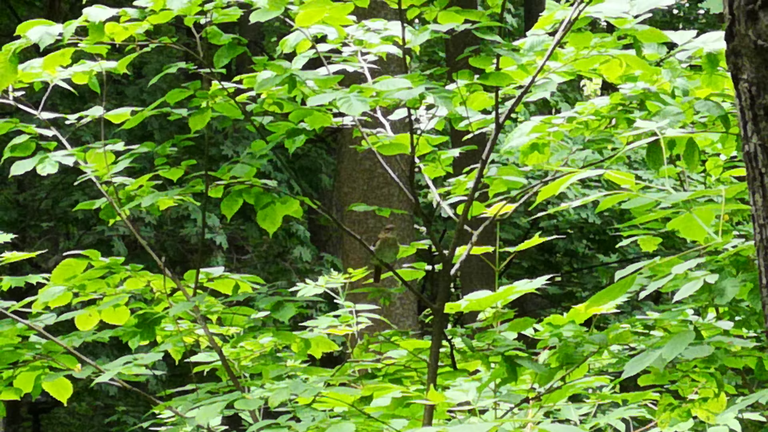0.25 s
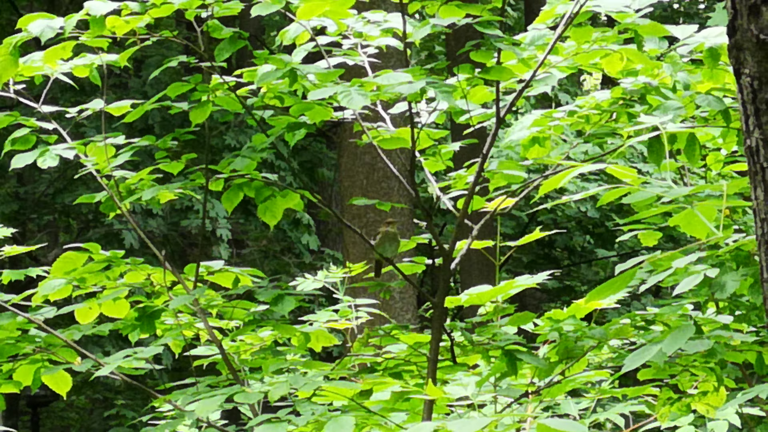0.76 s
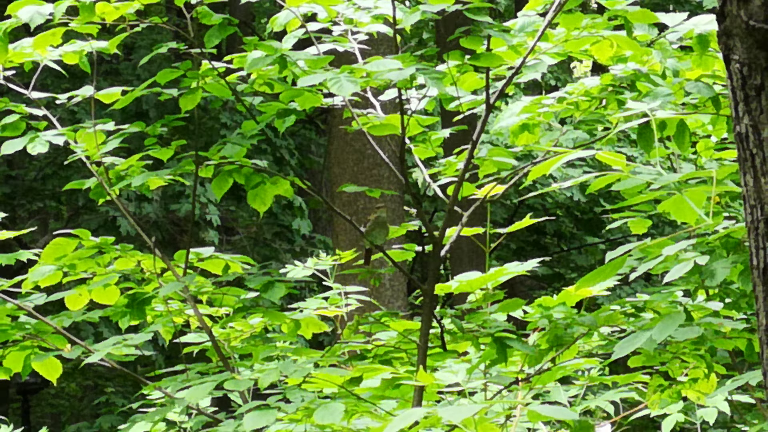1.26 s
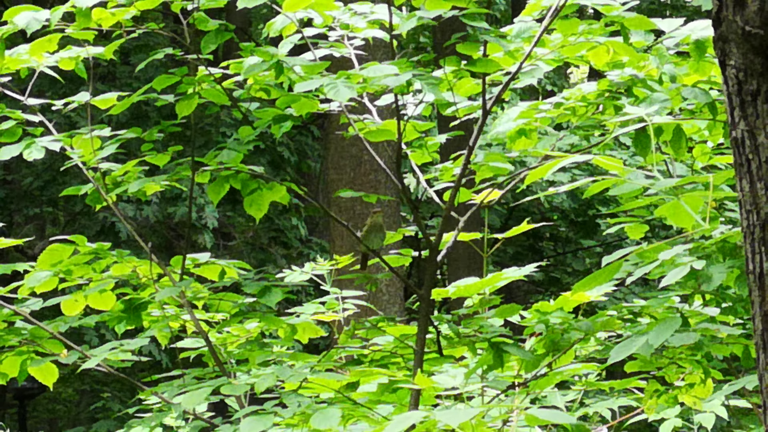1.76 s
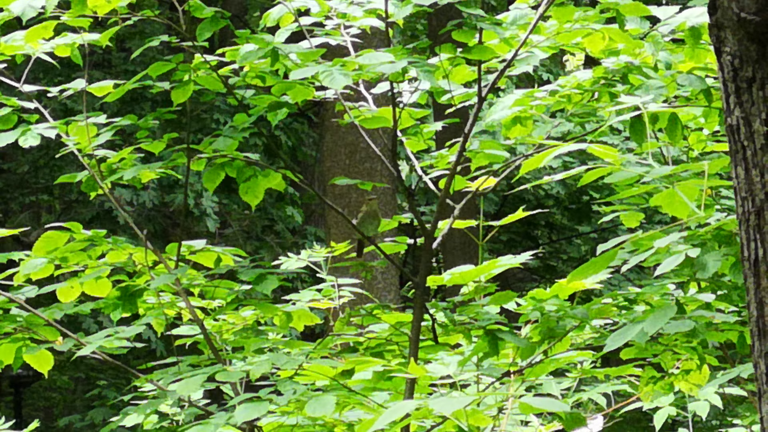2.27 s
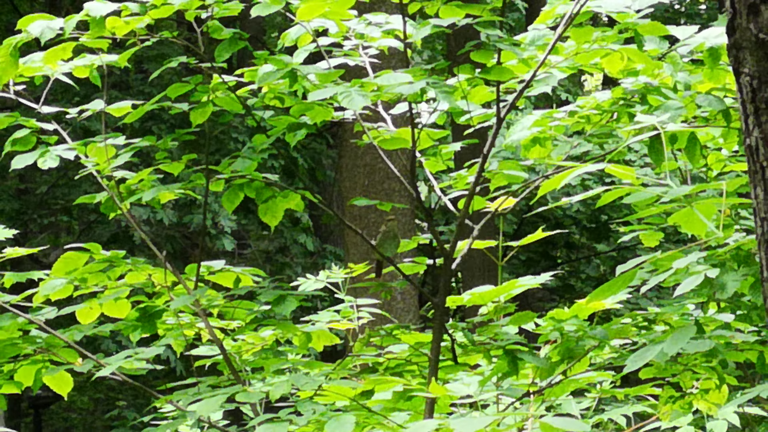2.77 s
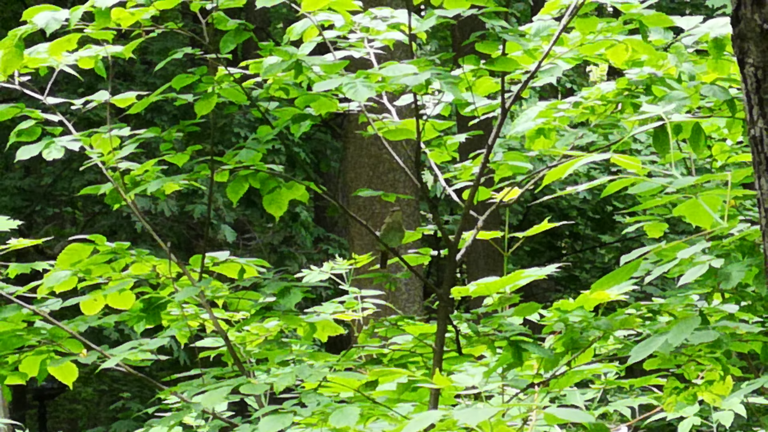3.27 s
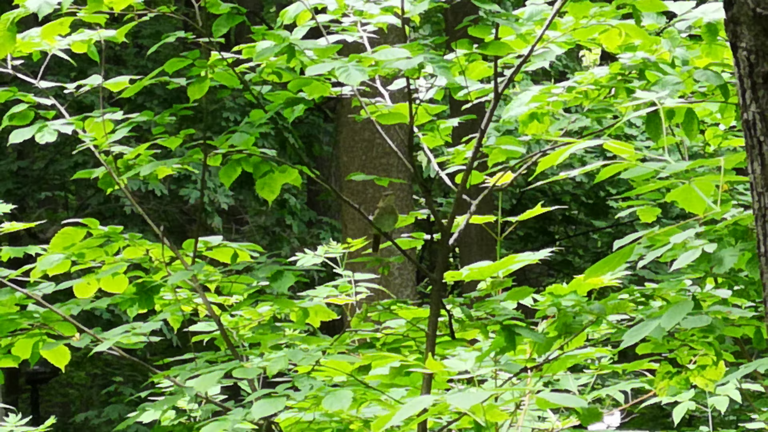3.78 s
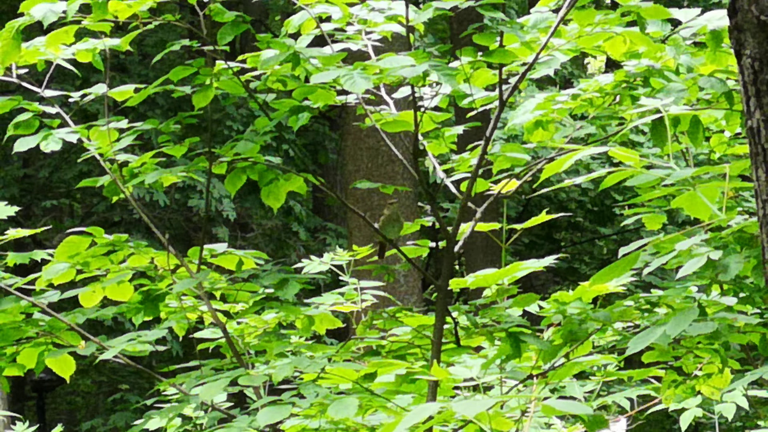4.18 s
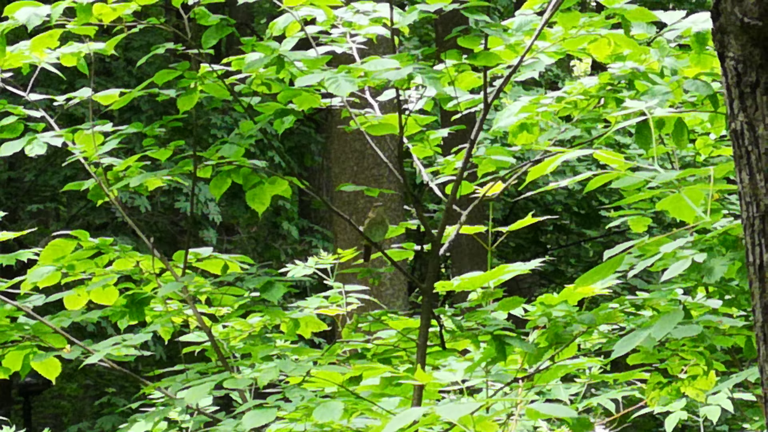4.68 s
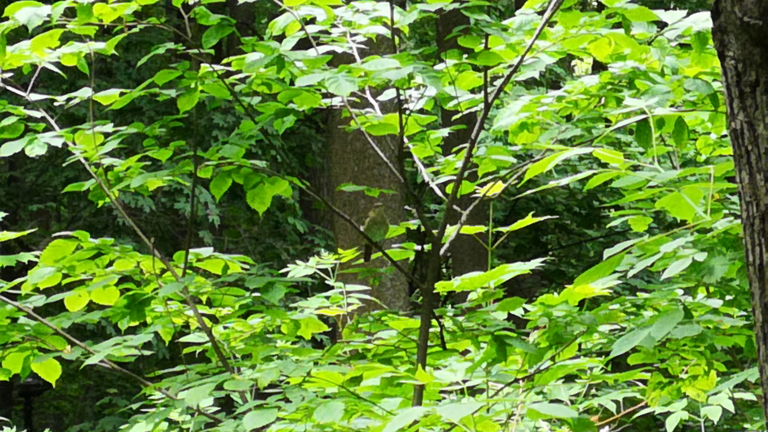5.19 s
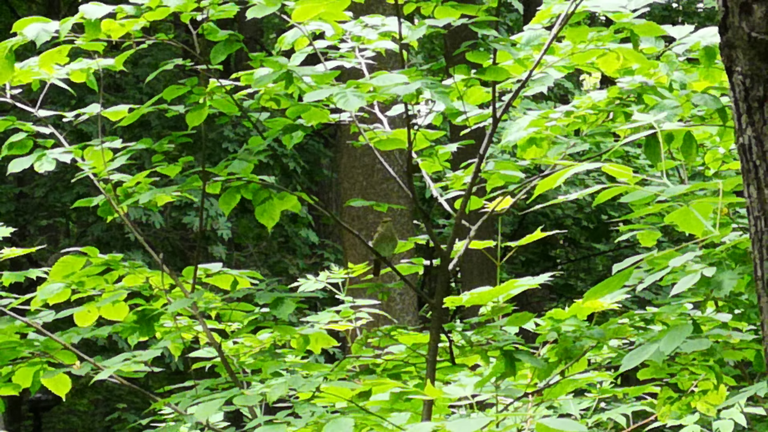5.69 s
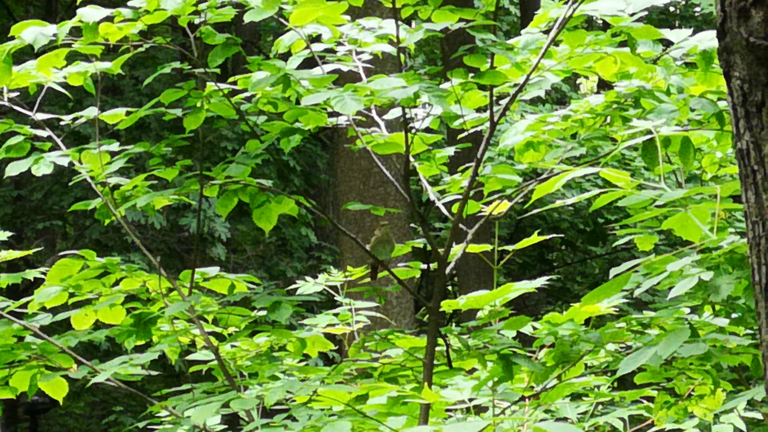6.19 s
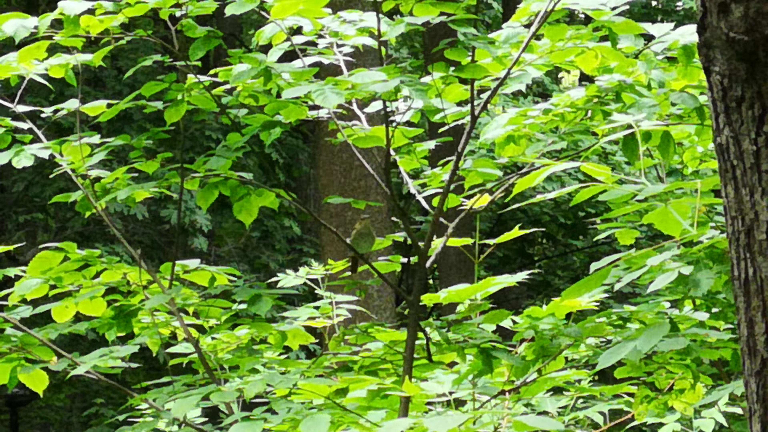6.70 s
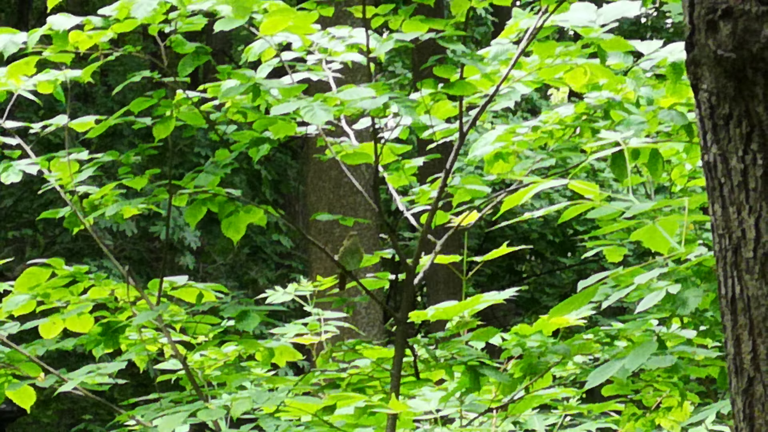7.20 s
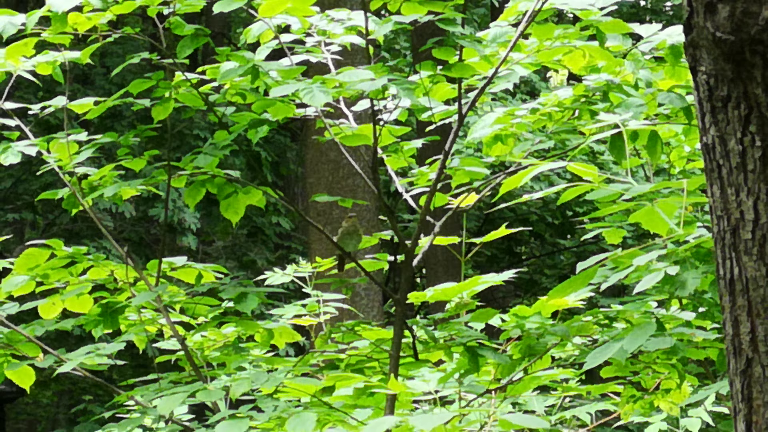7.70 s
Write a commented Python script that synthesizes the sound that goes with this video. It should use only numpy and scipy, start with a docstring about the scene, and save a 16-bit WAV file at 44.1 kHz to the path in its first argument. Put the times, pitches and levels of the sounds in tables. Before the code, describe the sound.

Whistled bird notes and a run of dry clicks echo among trees, with faint distant birds, rustling leaves and a low rumble.

```python
"""A nightingale in a leafy wood

A nightingale sings one phrase: thin high calls, sliding whistles, three held notes that end in a whip,
and a run of dry double clicks. Trunks and leaves scatter its song and the faint calls of far birds.
A low rumble lies under it all, and one gust stirs the leaves. Near the end something small taps
the casing beside the right microphone and makes it ring."""
import sys
import numpy as np
from scipy import signal
from scipy.fft import rfft, irfft
from scipy.io import wavfile

SR = 44100
rng = np.random.default_rng(int(sys.argv[2]) if len(sys.argv) > 2 else 0)


def unload_audio(sound):
    """Save the sound as a 16-bit wav file, at the path given as the first command line argument."""
    columns = np.transpose(np.atleast_2d(sound))
    # keep every value between -1 and 1, then stretch to whole-number steps
    steps = np.round(np.clip(columns, -1, 1) * 32767)
    wavfile.write(sys.argv[1], SR, steps.astype(np.int16))


N = 350154
TIME = np.arange(N) / SR

# The nightingale's held notes. Each row: start in seconds, length in seconds, opening pitch in Hz,
# held pitch in Hz, level in dB, swell over the note in dB, level of the closing whip in dB.
HELD_NOTES = [ (1.769, 0.045, 6060, 5723, -26, 13, -23.5), (2.393, 0.051, 6110, 5730, -24, 11, -21),
              (4.068, .049, 6430, 5800, -28, 17, -26)]


def undb(db):
    """Turn decibels into a number to multiply a sound by."""
    return 10 ** (np.asarray(db) / 20)


def add(out, start_s, sound):
    """Mix a sound in at the given time."""
    i = int(start_s * SR)
    out[..., i:i + sound.shape[-1]] += sound[..., :N - i]


def tone_curve(points):
    """Join (Hz, dB) points into a gain for every frequency."""
    hz, db = np.transpose(points)
    return undb(np.interp(np.log(np.fft.rfftfreq(N, 1 / SR) + 1), np.log(hz), db))


def wander(turns_per_s):
    """A random curve that drifts around zero, by about 1 either way."""
    points = rng.standard_normal(int(N / SR * turns_per_s) + 2)
    return np.interp(TIME * turns_per_s, np.arange(len(points)), points)


def fade(u, rise, fall):
    """Fade in and out as u runs from 0 to 1; rise and fall are shares of the sound's length."""
    opening = np.sin(np.pi / 2 * np.clip(u / rise, 0, 1)) ** 2
    closing = np.sin(np.pi / 2 * np.clip((1 - u) / fall, 0, 1)) ** 2
    return opening * closing


def wide_noise(spectrum):
    """Noise shaped by (Hz, dB) points: alike on both sides in the bass, wide in the treble."""
    # Stereo width. Each row: frequency in Hz, level of the differing part over the shared part in dB.
    width = [(60, -33.5), (110, -17.5), (200, -18.5), (380, -0.5), (700, 2), (1290, -4), (2380, 2),
             (4400, -1), (8120, 1.5), (15000, 0)]
    shared, differing = rfft(rng.standard_normal((2, N))) * tone_curve(spectrum)
    shared = irfft(shared, N)
    differing = irfft(differing * tone_curve(width), N)
    return np.array([shared + differing, shared - differing]) / shared.std()


def gust(peak_db, rise_db_per_s, fall_db_per_s, peak_s=2.556):
    """A gain that climbs to the height of the gust and then dies away."""
    since = TIME - peak_s
    return undb(peak_db - np.maximum(-since * rise_db_per_s, since * fall_db_per_s))


def far_rumble(growth_db_per_s=0.2):
    """A low rumble grows slowly as the breeze freshens, and surges with the gust."""
    # The rumble's tone. Each row: frequency in Hz, relative level in dB.
    spectrum = [(12, -36.5), (25, -4), (40, -8), (50, 0.5), (59, 3.5), (68, -1), (85, -8), (115, -8.5),
                (160, -15), (220, -18), (300, -26), (400, -32.5), (520, -40.5), (800, -42.5), (2000, -96)]
    breeze = undb(-38.5 + growth_db_per_s * TIME)
    surge = gust(-34, rise_db_per_s=132.5, fall_db_per_s=10.5)
    return wide_noise(spectrum) * np.hypot(breeze, surge) * undb(0.98 * wander(8))


def air_hush(still_db=-53.37):
    """The soft hush of the air swells with the gust and slowly settles."""
    # The hush's tone. Each row: frequency in Hz, relative level in dB.
    spectrum = [(260, -35), (450, -10), (580, -16), (680, -9), (850, -1.5), (990, 0), (1210, -7),
                (1700, -9.5), (2500, -21), (3050, -27.5), (3700, -33.5), (4800, -35.5), (6300, -34),
                (7400, -28), (8700, -43), (15500, -45)]
    gain = np.hypot(undb(still_db), gust(-56.5, rise_db_per_s=23.5, fall_db_per_s=3))
    return wide_noise(spectrum) * gain * undb(0.4 * wander(1.98))


def leaves(trim_db=-2, flutter_db=1.5, growth_db_per_s=1.02):
    """Leaves rustle well ahead of the gust, and branches swish at its height."""
    # The thin rustle of leaves. Each row: frequency in Hz, relative level in dB.
    leaf_tone = [(2000, -19), (3000, -13.5), (3300, 1.5), (4400, -1.5), (5500, -2), (6500, -9), (7700, -19),
                 (8700, -32), (14000, -35)]
    # The fuller swish of branches. Each row: frequency in Hz, relative level in dB.
    branch_tone = [(1200, -19.5), (2100, -12.5), (2500, -5), (3000, -5), (3800, -10), (6000, -39.5),
                   (12000, -55)]
    stir = undb(-80 + growth_db_per_s * TIME)
    rustle = np.hypot(stir, gust(-52, rise_db_per_s=11.5, fall_db_per_s=16))
    swish = gust(-52.5, rise_db_per_s=75, fall_db_per_s=11)
    return sum(wide_noise(tone) * gain * undb(trim_db + flutter_db * wander(35))
               for tone, gain in ((leaf_tone, rustle), (branch_tone, swish)))


def bird_voice(hz, gain, second_db=-41, third_db=-60, waver=0.003):
    """A nearly pure, slightly unsteady tone with faint overtones at two and three times its pitch."""
    points = rng.standard_normal(12)
    drift = np.interp(np.linspace(0, 11, len(hz)), np.arange(12), points)
    phase = 2 * np.pi * np.cumsum(hz * (1 + waver * drift)) / SR
    overtones = undb(second_db) * np.sin(2 * phase) + undb(third_db) * np.sin(3 * phase)
    return gain * (np.sin(phase) + overtones)


def wood_echoes(song, near_fade_s=0.19, far_fade_s=0.86, treble_fade_s=0.37, trunk_count=12):
    """Nearby leaves scatter the song at once, single trunks echo it, and the deep wood rings on."""
    t = np.arange(int(1.3 * SR)) / SR
    below_treble = signal.butter(6, 6600, fs=SR, output="sos")
    sides = []
    for _ in range(2):
        near, far = rng.standard_normal((2, len(t)))
        near *= undb(-60 * t / near_fade_s) * (1 - np.exp(-t / 0.0027))
        # Leaves and air swallow the highest notes first.
        low = signal.sosfiltfilt(below_treble, far)
        far = low * undb(-60 * t / far_fade_s) + (far - low) * undb(-60 * t / treble_fade_s)
        far *= 1 - np.exp(-t / 0.021)
        trunks = np.zeros(len(t))
        delays_s = rng.uniform(0.006, 0.17, trunk_count)
        trunks[(delays_s * SR).astype(int)] = rng.choice([-1, 1], trunk_count) / (delays_s + 0.013)
        echoes = sum(undb(db) * part / np.linalg.norm(part)
                     for db, part in ((-6, near), (-12, far), (-12, trunks)))
        sides.append(signal.fftconvolve(song, echoes)[:N])
    return signal.sosfilt(signal.butter(3, 10000, fs=SR, output="sos"), np.array(sides))


def far_birds(direct_db=-5, echo_db=3):
    """Faint sliding notes and a thin trill come from deep among the trees."""
    # Far calls. Each row: start in seconds, number of notes, seconds from note to note,
    # note length in seconds, starting pitch in Hz, ending pitch in Hz, relative level in dB.
    calls = [ (.14, 3, .05, .08, 2700, 2150, -61), (.88, 3, .1, .09, 2900, 2200, -64),
             (2.05, 3, .17, .06, 3480, 3080, -51), (4.62, 3, .05, .05, 2100, 3000, -63),
             (5.6, 3, .06, .05, 2800, 2100, -65), (7.198, 12, .0642, .017, 5500, 6900, -64)]
    song = np.zeros(N)
    for start, count, step, length, from_hz, to_hz, db in calls:
        u = np.linspace(0, 1, int(length * SR))
        for k in range(count):
            gain = undb(db + 2 * rng.standard_normal()) * fade(u, rise=0.4, fall=0.31)
            add(song, start + k * step, bird_voice(from_hz + (to_hz - from_hz) * u, gain))
    return undb(direct_db) * song + undb(echo_db) * wood_echoes(song)


def whistle(hz, db, swell_db, overtone_db=-46.5):
    """One note along a pitch curve; it grows by swell_db, or shrinks if that is negative."""
    u = np.linspace(0, 1, len(hz))
    gain = undb(db + swell_db * (u - 0.5)) * fade(u, rise=0.35, fall=0.16)
    return bird_voice(hz, gain, second_db=overtone_db)


def high_calls(crest=0.69, climb=0.07, drop=0.22):
    """The pitch arches: a small climb to its crest, then a steep drop."""
    # Thin high calls. Each row: start in seconds, length in seconds, top pitch in Hz, level in dB,
    # swell in dB, left minus right in dB.
    calls = [(0.157, 0.035, 7620, -51, 19, -2), (0.768, .036, 7590, -29, 16.5, 1)]
    for start, length, top_hz, db, swell_db, pan_db in calls:
        u = np.linspace(0, 1, int(length * SR))
        climbing = climb * (1 - u / crest) ** 2
        dropping = drop * ((u - crest) / (1 - crest)) ** 2
        hz = top_hz * (1 - np.where(u < crest, climbing, dropping))
        yield start, whistle(hz, db, swell_db), pan_db


def sliding_whistles(arrival=0.9):
    """The voice eases from one pitch to another, arriving just before the note ends."""
    # Slides. Each row: start in seconds, length in seconds, starting pitch in Hz, ending pitch in Hz,
    # level in dB, swell in dB, left minus right in dB.
    slides = [ (0.436, 0.034, 4004, 3950, -38, 9.5, 6), (0.465, 0.015, 4050, 4560, -47, -8, 2),
              (0.5, 0.027, 5120, 4620, -38, 10.5, 28), (1.018, 0.039, 3980, 3752, -30, 14, -6.5),
              (1.058, .012, 3700, 4300, -48, -8.5, -5), (1.083, .039, 4980, 4447, -28.5, 6, 23),
              (1.372, 0.076, 2030, 1615, -34, -5.5, -6.5), (1.528, 0.057, 1898, 1737, -31.5, -1.5, 4),
              (2.052, .074, 1880, 1402, -31.5, 8, -2), (2.196, 0.073, 1860, 1559, -31, 0, 8.5),
              (3.909, 0.013, 2220, 1340, -39, -20, -7)]
    for start, length, from_hz, to_hz, db, swell_db, pan_db in slides:
        u = np.linspace(0, 1, int(length * SR))
        hz = to_hz + (from_hz - to_hz) * (1 + np.cos(np.pi * u / arrival)) / 2
        yield start, whistle(hz, db, swell_db), pan_db


def held_notes(lowest_at=0.516, flatness=2.35, pan_db=2):
    """The pitch sinks, holds around the middle of the note, and lifts again towards the whip."""
    for start, length, opening_hz, held_hz, db, swell_db, _ in HELD_NOTES:
        u = np.linspace(0, 1, int(length * SR))
        hz = held_hz + (opening_hz - held_hz) * np.abs(1 - u / lowest_at) ** flatness
        yield start, whistle(hz, db, swell_db, overtone_db=-29), pan_db


def whips(length_s=0.0125, overlap_s=0.0071, hold=0.371, bottom_hz=3110, pan_db=2):
    """Each held note ends by hanging at its opening pitch, then plunging about an octave."""
    u = np.linspace(0, 1, int(length_s * SR))
    drop = np.clip((u - hold) / (1 - hold), 0, 1)
    for start, note_s, top_hz, *_, db in HELD_NOTES:
        hz = top_hz + (bottom_hz - top_hz) * drop
        whip = bird_voice(hz, undb(db) * fade(u, rise=0.58, fall=0.28))
        yield start + note_s - overlap_s, whip, pan_db


def double_clicks(gap_s=0.0064, length_s=0.0044, drop=0.28, chirp_db=1, snap_db=-5, snap_s=0.0033):
    """Two tiny falling chirps come close together, each with a dry snap of noise."""
    # Click pairs. Each row: start in seconds, pitch in Hz, relative level in dB,
    # second click minus first in dB, left minus right in dB.
    pairs = [ (2.6694, 7060, -28, -0.5, 0), (2.8656, 7070, -28.5, 2, 3.5), (3.0592, 7060, -26.5, -2.5, 0.5),
             (3.2486, 7230, -31, 1, 1), (3.4376, 7130, -26.5, -1.5, 2), (3.6444, 6900, -32, 1.5, 3)]
    u = np.linspace(0, 1, int(length_s * SR))
    snap_band = signal.butter(3, [2700, 9600], "bandpass", fs=SR, output="sos")
    for start, pitch_hz, db, second_click_db, pan_db in pairs:
        hz = pitch_hz * (1 - drop * (u - 0.4))
        for delay, click_db in ((0, db), (gap_s, db + second_click_db)):
            chirp = bird_voice(hz, fade(u, rise=0.23, fall=0.67), second_db=-42, waver=0.027)
            burst = rng.standard_normal(len(u)) * np.exp(-u * length_s / snap_s)
            click = undb(chirp_db) * chirp + undb(snap_db) * signal.sosfilt(snap_band, burst)
            yield start + delay, undb(click_db) * click, pan_db


def nightingale(right_lag_s=0.000036):
    """The phrase arrives directly, a little from the left, and again as echoes from all round."""
    direct, song = np.zeros((2, N)), np.zeros(N)
    phrase = [*sliding_whistles(), *high_calls(), *held_notes(), *whips(), *double_clicks()]
    for start, sound, pan_db in phrase:
        side_gains = undb([[pan_db / 2], [-pan_db / 2]])
        add(direct, start, sound * side_gains / side_gains.mean())
        add(song, start, sound)
    delay = np.exp(-2j * np.pi * np.fft.rfftfreq(N, 1 / SR) * right_lag_s)
    direct[1] = irfft(rfft(direct[1]) * delay, N)
    return direct + wood_echoes(song)


def casing_tap(start_s=6.7025, left_lag_s=0.00052, left_db=-11, thud_s=0.00082, scuff_s=0.12):
    """A tap rings the casing on the right and scuffs off it; the left hears it later and duller."""
    # The casing's ringing tones. Each row: pitch in Hz, seconds to fade by 60 dB, relative level in dB.
    tones = [(188, 0.0062, -34), (1410, 0.00082, -37.5), (2020, 0.011, -9.5), (2790, 0.0056, -8.5),
             (3800, 0.0018, -13.5), (5620, 0.0035, -13), (7130, 0.0026, -15)]
    t = np.arange(int(0.04 * SR)) / SR
    ring = sum(undb(db - 60 * t / fade_s) * np.sin(2 * np.pi * hz * t) for hz, fade_s, db in tones)
    tick = undb(-5) * np.exp(-t / 0.00005)
    soften = signal.butter(4, 6600, fs=SR, output="sos")
    knock = -undb(-1) * signal.sosfilt(soften, ring + tick)
    dull_knock = signal.sosfilt(signal.butter(1, 1500, fs=SR, output="sos"), knock)
    thud = -undb(-18) * t / thud_s * np.exp(1 - t / thud_s) * (1 - t / thud_s / 2)
    u = np.linspace(0, 1, int(scuff_s * SR))
    scuff = signal.fftconvolve(rng.standard_normal(len(u)), np.diff(knock))[:len(u)]
    scuff *= fade(u, rise=0.05, fall=0.37)
    out = np.zeros((2, N))
    add(out[1], start_s, knock + thud)
    add(out[1], start_s, undb(-54) * scuff / scuff.std())
    add(out[0], start_s + left_lag_s, undb(left_db) * dull_knock + thud)
    return out


def scene():
    """Mix birds and leaves, a little duller on the right, with the rumble, the hush and the tap."""
    # The treble dip of the right microphone's opening. Each row: frequency in Hz, gain in dB.
    right_dip = [(1000, -0.5), (1700, 0.5), (3000, -3), (3900, -8.5), (4600, -11), (5300, -8.5),
                 (5800, -0.5), (6500, -4.5), (7400, -2.5), (9000, -2.5)]
    left, right = nightingale() + far_birds() + leaves()
    right = irfft(rfft(right) * tone_curve(right_dip), N)
    return np.array([left, right]) + far_rumble() + air_hush() + casing_tap()


def record(dry, top_hz=15750):
    """Flatten any peaks beyond full scale and cut the highest treble."""
    return signal.sosfilt(signal.ellip(10, 0.1, 80, top_hz, fs=SR, output="sos"), np.clip(dry, -1, 1))


dry = scene()
out = record(dry)
unload_audio(out)
```